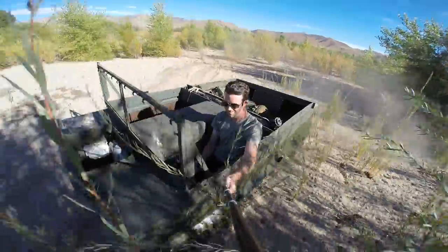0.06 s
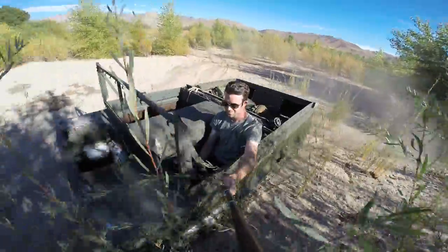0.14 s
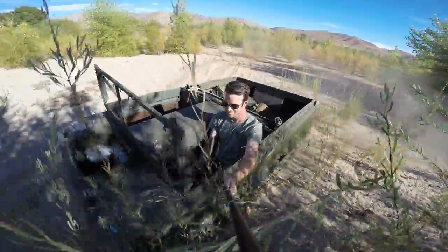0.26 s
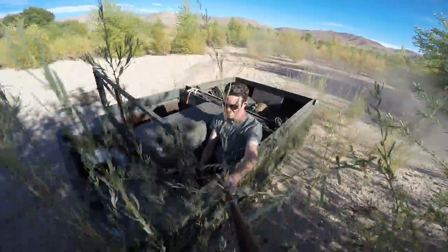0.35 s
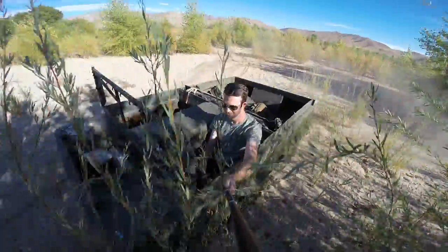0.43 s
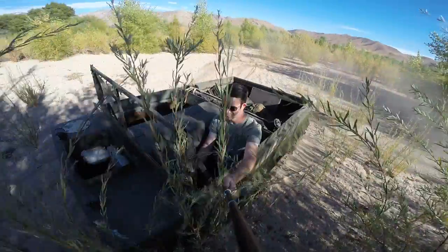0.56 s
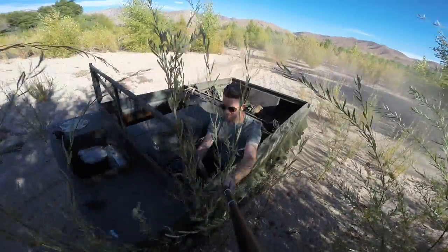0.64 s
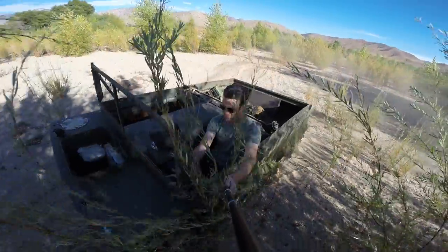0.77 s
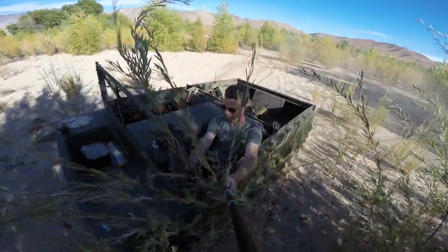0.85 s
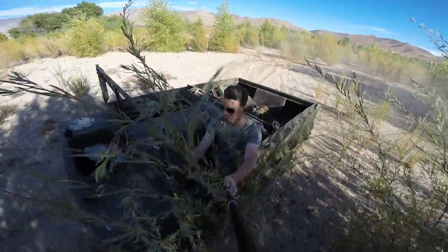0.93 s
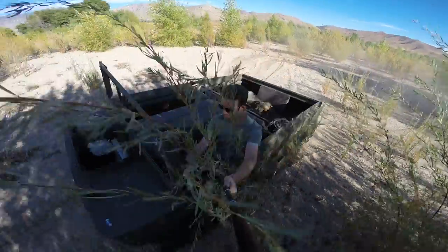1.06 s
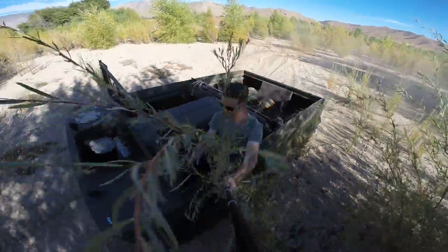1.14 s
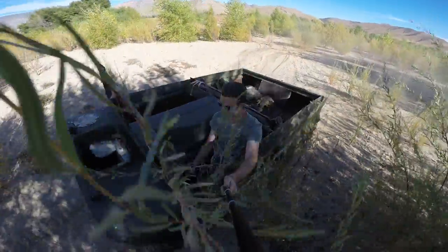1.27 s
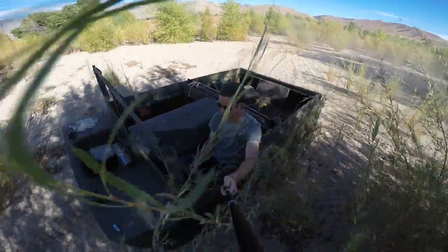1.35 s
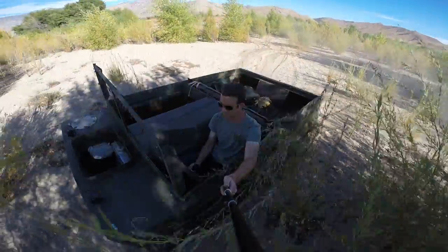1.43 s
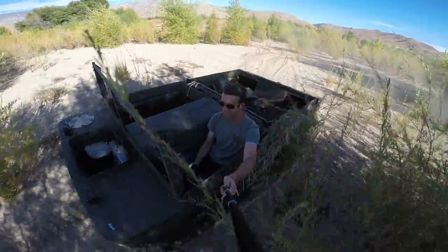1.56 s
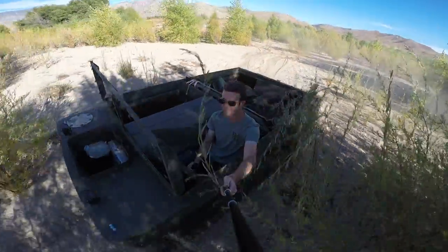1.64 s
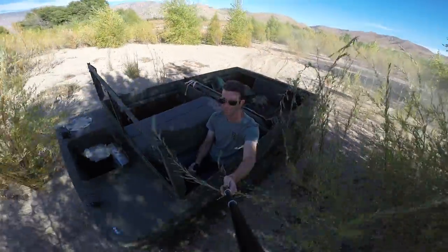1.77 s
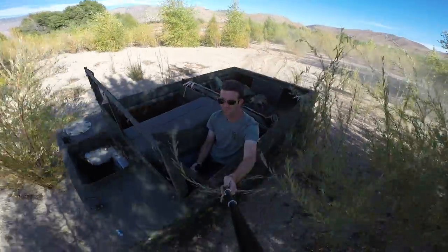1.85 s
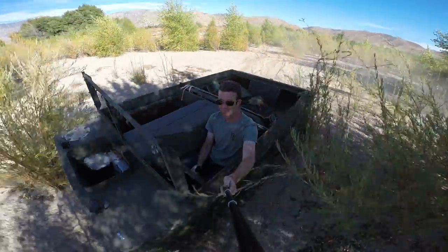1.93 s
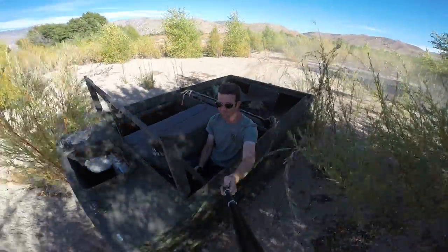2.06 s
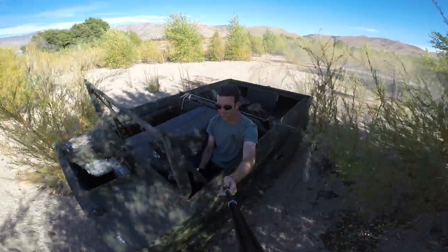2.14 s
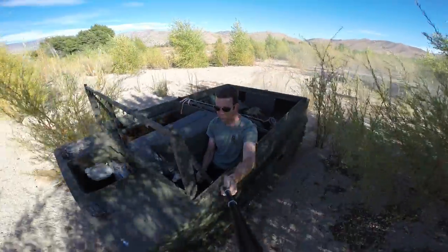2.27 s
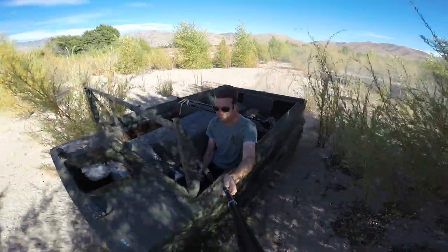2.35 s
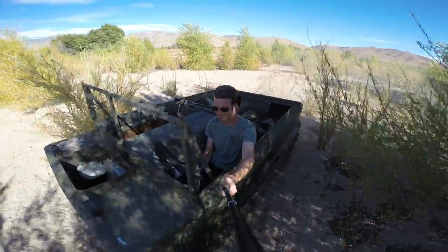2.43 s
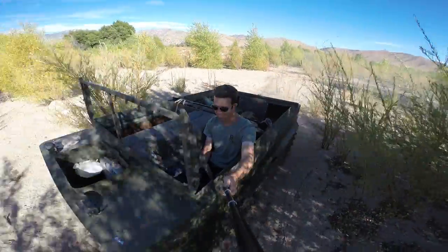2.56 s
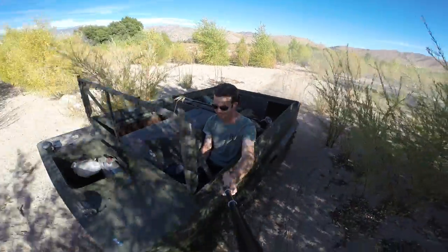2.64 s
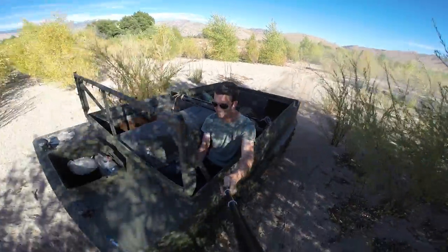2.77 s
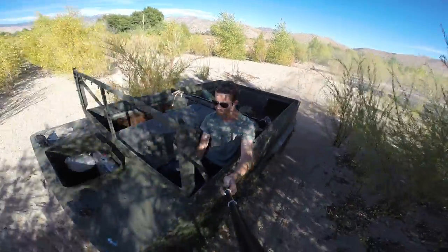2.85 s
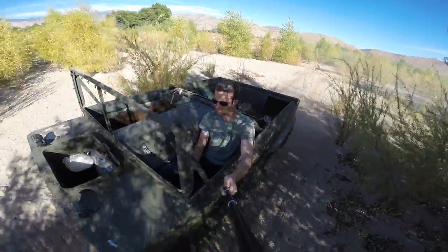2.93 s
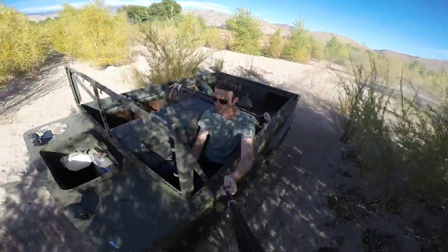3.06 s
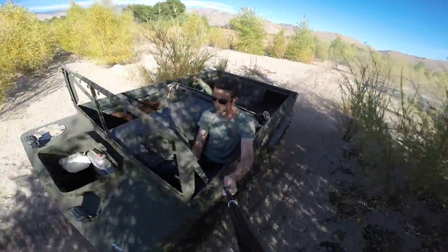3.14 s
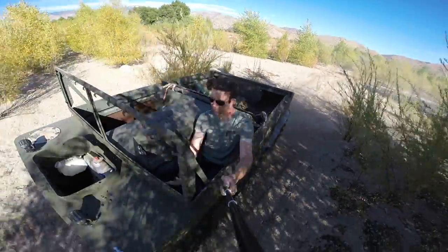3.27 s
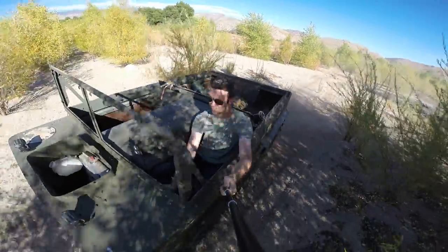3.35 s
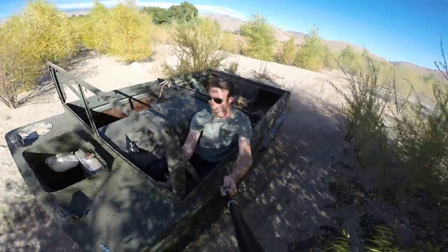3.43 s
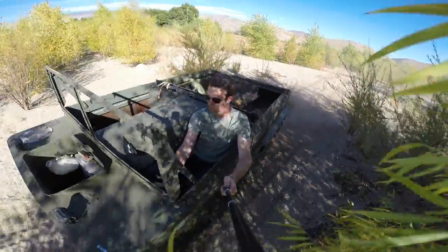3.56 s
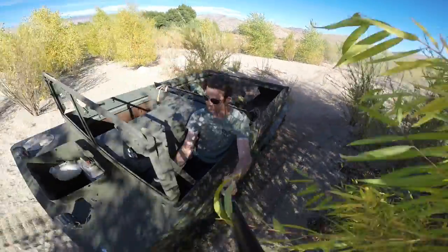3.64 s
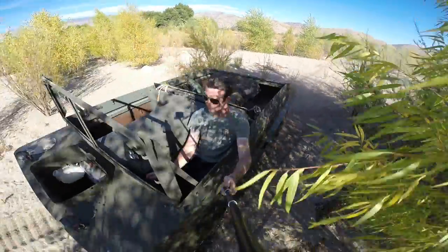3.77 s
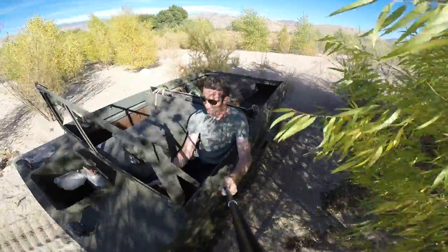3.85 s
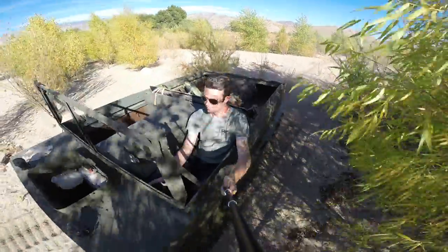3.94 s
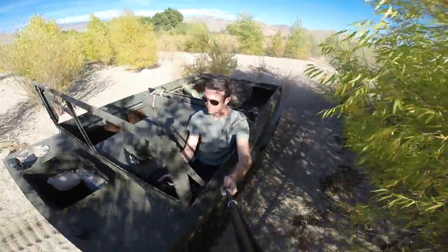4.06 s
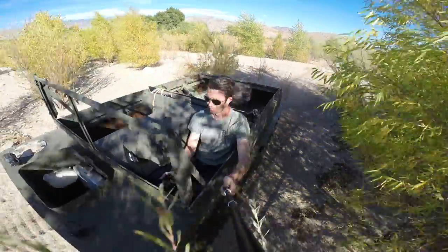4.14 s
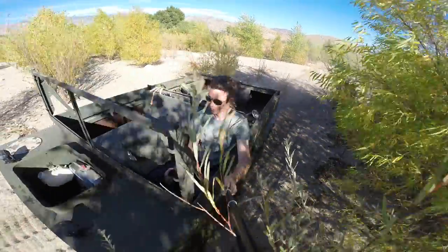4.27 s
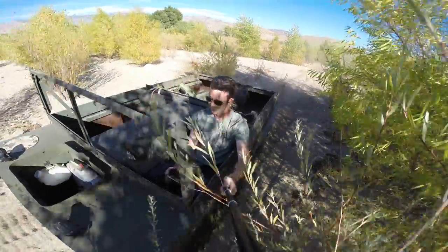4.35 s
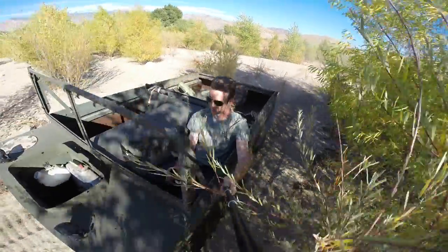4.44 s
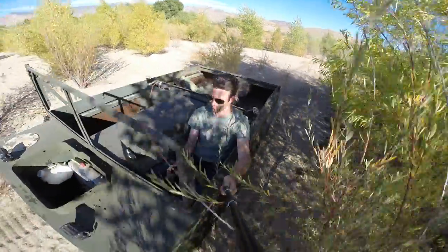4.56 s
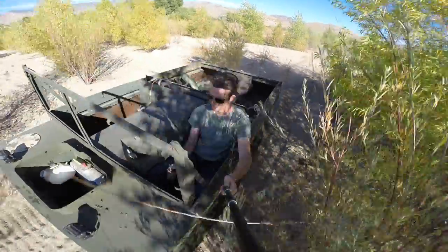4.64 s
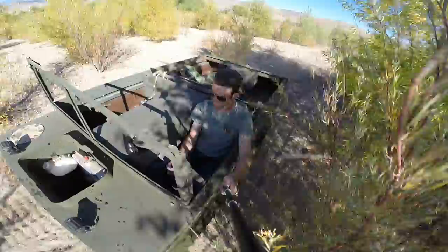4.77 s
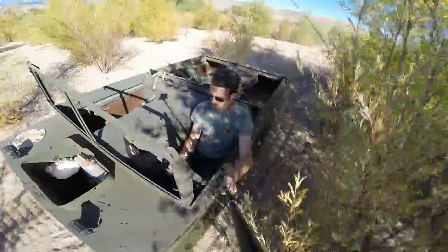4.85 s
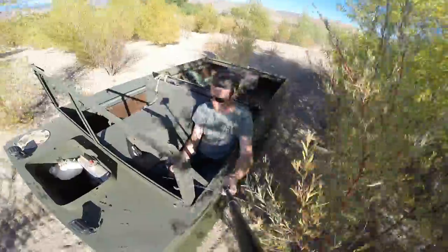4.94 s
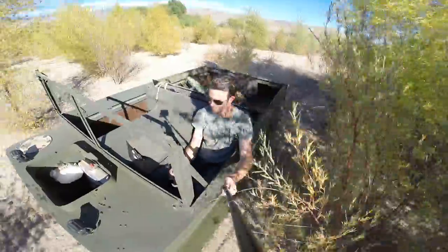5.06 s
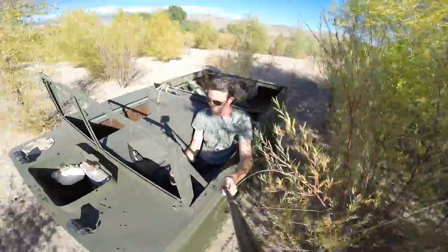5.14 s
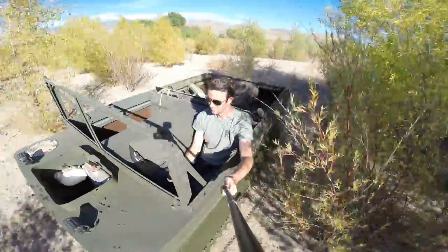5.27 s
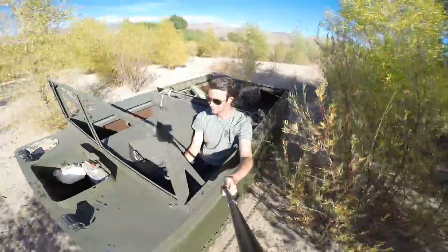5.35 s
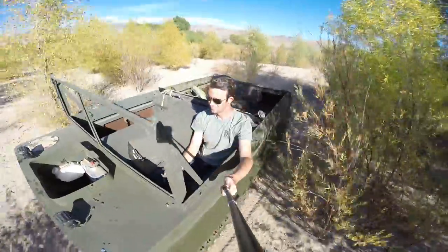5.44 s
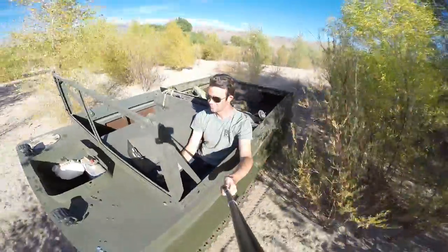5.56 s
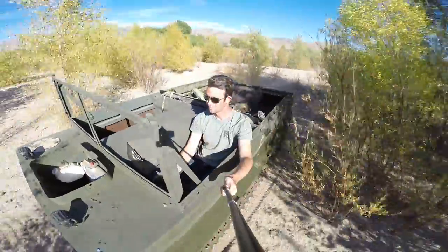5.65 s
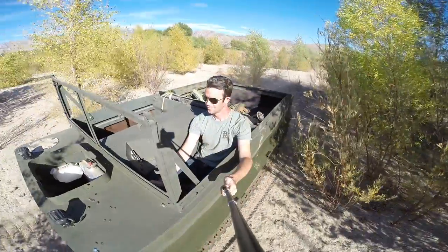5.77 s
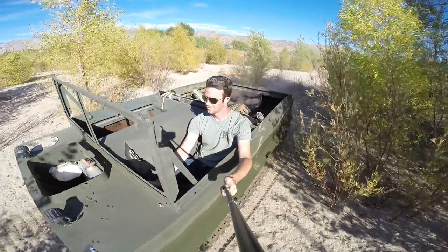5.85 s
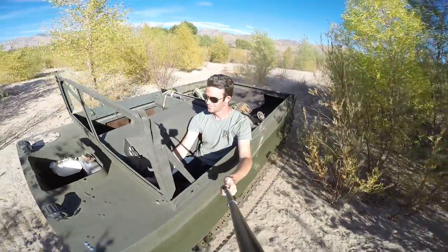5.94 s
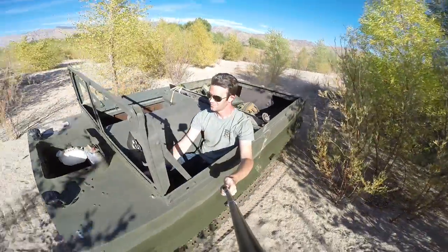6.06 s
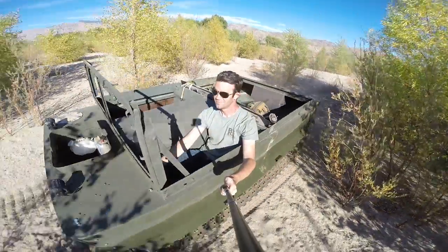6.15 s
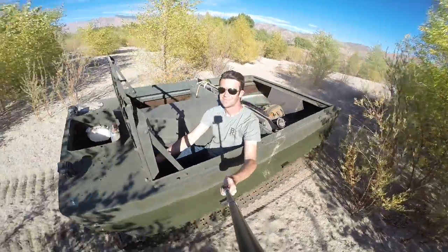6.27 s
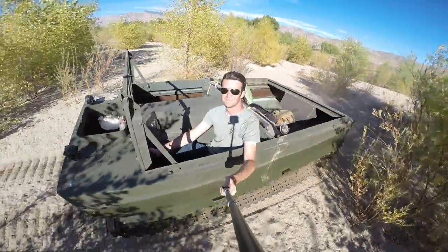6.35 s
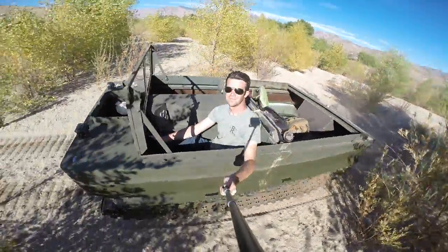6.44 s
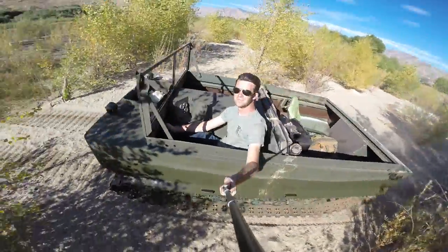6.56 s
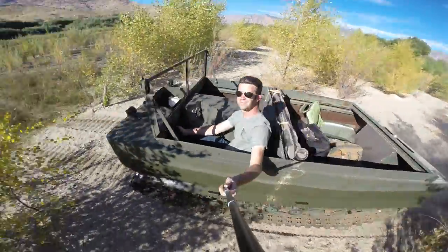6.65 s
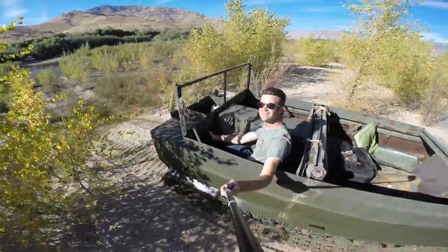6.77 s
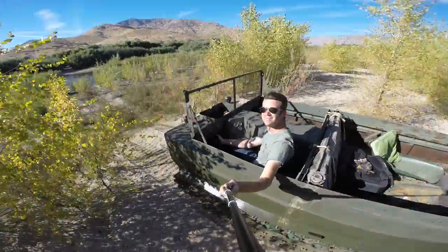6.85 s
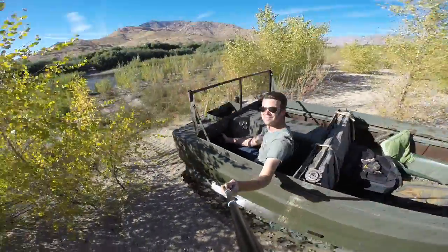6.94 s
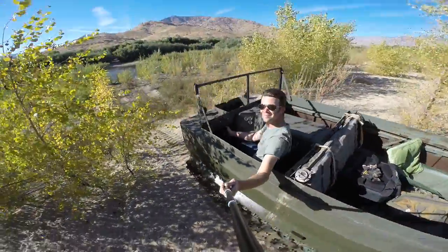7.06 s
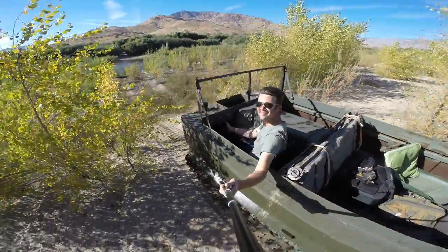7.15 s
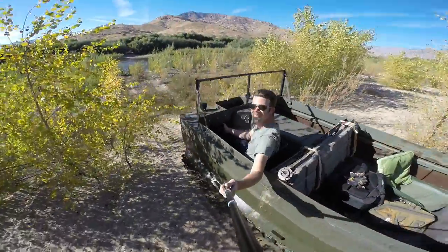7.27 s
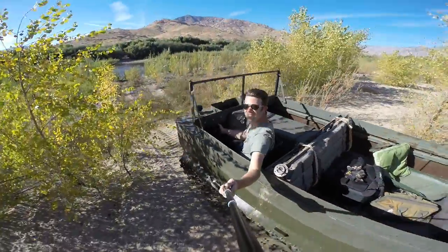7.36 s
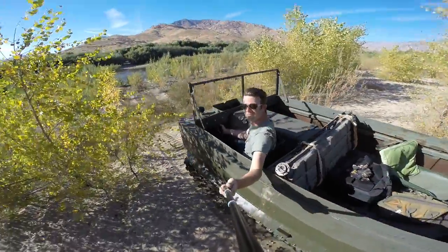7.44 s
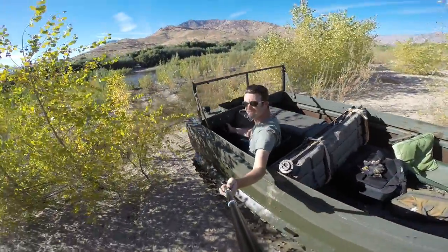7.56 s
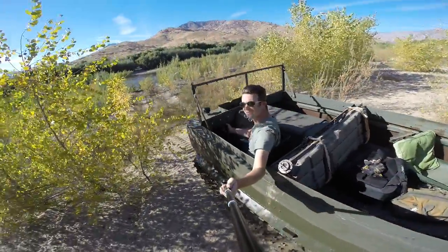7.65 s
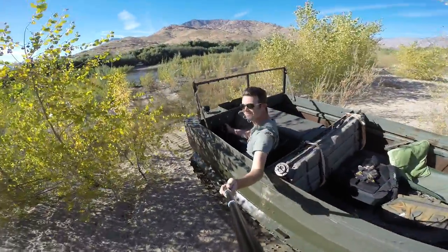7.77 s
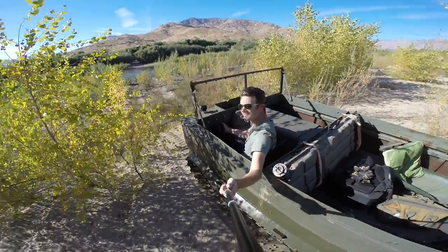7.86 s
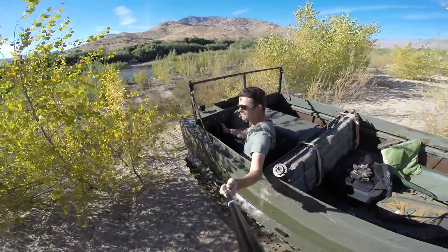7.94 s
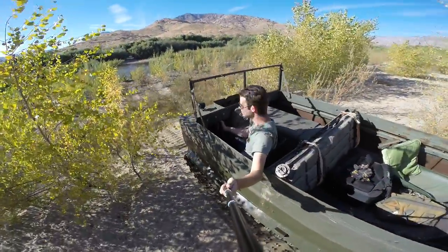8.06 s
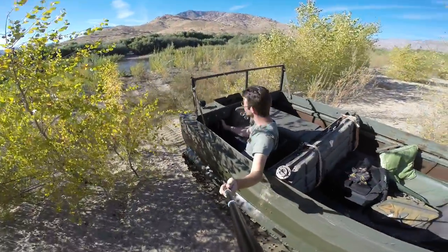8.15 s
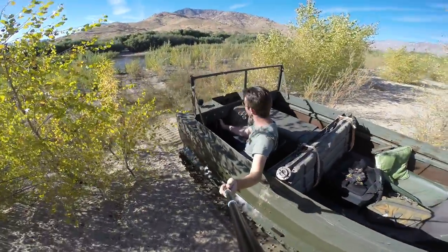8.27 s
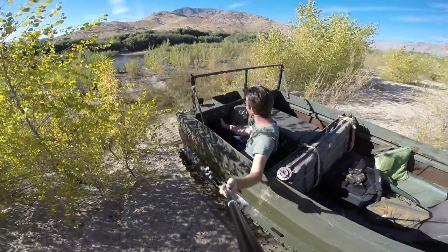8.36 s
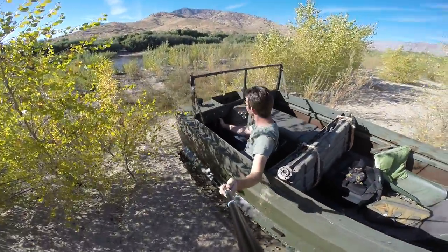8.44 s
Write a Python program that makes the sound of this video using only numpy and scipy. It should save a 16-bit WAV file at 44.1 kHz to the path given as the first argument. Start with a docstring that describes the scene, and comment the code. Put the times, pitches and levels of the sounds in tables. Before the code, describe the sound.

Twigs crack, rap and scrape loudly on a pole-mounted camera case over a quiet droning engine, hissing tracks in sand and low wind rumble.

```python
"""An engine drones, tracks hiss in sand and wind rumbles at the microphone; soon twigs rap and scrape
a small camera case on a hand-held pole, beside a tracked vehicle pushing through brush.
Engine: wavering sine orders plus rough roar. Tracks and wind: noise shaped by spectrum tables.
Scrapes and raps: slips and blows that ring the case modes. Jolts: decaying bending modes of the pole."""
import sys
import numpy as np
from scipy import signal
from scipy.io import wavfile
from scipy.ndimage import uniform_filter1d

SR = 44100
rng = np.random.default_rng(int(sys.argv[2]) if len(sys.argv) > 2 else 0)


def log_audio(samples):
    """Write samples as a 16-bit WAV file to the path given in sys.argv[1]."""
    # one column per channel
    frames = np.atleast_2d(samples).T
    # limit to full scale, then quantise
    limited = np.clip(frames, -1, 1)
    pcm = np.round(limited * 32767).astype(np.int16)
    wavfile.write(sys.argv[1], SR, pcm)


N = 375291

# Running gear spectrum, tracks, fan and casing heard through the case: (frequency [Hz], level [dB])
GEAR_SPECTRUM = [(120, -24.5), (200, 4), (268, -14), (725, -14), (1110, -22), (1310, -12.5), (1540, -20),
                 (1960, -15), (3400, -22), (5390, -31), (6130, -20), (7930, -31), (13300, -41.5),
                 (15400, -51), (16300, -73.5)]
# Humps added to it at the side of the vehicle: (centre [Hz], width [Hz], height [dB])
GEAR_SIDE_HUMPS = [(1310, 160, 1), (3450, 71, 7), (4730, 390, 7.5), (6140, 350, 4)]
# Wind spectrum: (frequency [Hz], level [dB])
WIND_SPECTRUM = [(8.8, -24.5), (15, 0), (37, 4.5), (83, 0.5), (126, -10.5), (162, -25), (196, -20.5),
                 (500, -31), (650, -65), (1100, -120)]
# Wind strength at the microphone: (time [s], level [dB])
GUSTS = [(0, -34.5), (.9, -36), (1.12, -28.5), (1.3, -34), (1.8, -21.5), (2.15, -36), (4.3, -38.5),
         (5.7, -39.5), (6.2, -35.5), (6.65, -36), (6.9, -28), (7.2, -34.5), (7.8, -39), (8.51, -41)]
# Engine course: (time [s], half the firing rate [Hz], level [dB])
ENGINE_COURSE = [(0, 62, -40), (.6, 63.5, -41), (1.6, 67.8, -40), (2.2, 67.14, -37.5), (2.9, 61.7, -41.5),
                 (3.4, 59.3, -43), (3.7, 62.83, -42.5), (4.4, 70.8, -41.5), (4.9, 65.73, -37.5),
                 (5.8, 55, -55), (6.5, 47.74, -49.5), (8, 40.8, -49.5), (8.2, 43, -38.5), (8.51, 48.8, -41)]
# Exhaust orders: (multiple of half the firing rate, level [dB])
EXHAUST_ORDERS = [(1, 1), (2, 1), (3, -20.5), (4, -22)]
# Background sinks around the end of two long loud scrapes: (time of reaching the lowest [s], depth [dB])
DIPS = [(1.43, -15), (4.88, -17)]
# Ringing modes of the camera case: (frequency [Hz], level [dB], undamped t60 [s])
CASE_MODES = [(501, -27.5, .12), (618, -14.5, 0.12), (727, -13.5, 0.065), (1071.4, -16.5, 0.13),
              (1388, 0, 0.033), (1557, -7.5, 0.025), (1780, 5.5, 0.021), (1932, -21, 0.24),
              (2308, 4.5, 0.019), (2586, 1.5, 0.027), (2758, -8, 0.032), (3165, -18, 0.039),
              (3580, -10, 0.024), (4067, -10.5, 0.027), (4380, -16.5, 0.017), (5155, -16.5, 0.047),
              (5960, -11.5, 0.023), (6560, -14.5, 0.023), (7366, -10.5, 0.016), (9300, -11, 0.0042),
              (10760, -21, 0.011), (13160, -34.5, .012), (15000, -42.5, .015)]
# Branches sliding over the case: (start [s], end [s], level at start [dB], level at end [dB],
# leafiness [0 bare twigs that ring .. 1 leafy sprays that slap and damp])
SCRAPES = [(0.188, .26, -35, -36, 0.22), (0.259, .38, -38, -38.5, .02), (0.381, 0.518, -36, -35.5, 0.24),
           (0.529, 0.818, -51, -44, 0.1), (0.859, 1.003, -42, -26.5, 0.22), (0.998, 1.098, -31, -43, .05),
           (1.099, 1.446, -39.5, -31, 0.13), (1.706, 1.86, -48.5, -48, 0.07),
           (1.865, 2.082, -38.5, -41, 0.37), (3.553, 3.654, -44, -47, 0.56), (3.757, 3.875, -50, -45, 0.61),
           (4.347, 4.53, -36, -28.5, 0.46), (4.53, 4.908, -29.5, -35.5, 0.53),
           (5.032, 5.104, -46, -63.5, 0.51), (5.102, 5.209, -51.5, -42, 0.1),
           (5.21, 5.317, -44, -32.5, 0.35), (6.698, 6.783, -48, -38, 0.062), (6.789, 6.846, -31, -35, .05),
           (6.864, 7.068, -45.5, -45.5, 0.027), (7.141, 7.199, -47.5, -36.5, 0.028),
           (7.2, 7.27, -40.5, -54, 0.034), (7.558, 7.675, -57, -60, .03)]
# Bending modes of the pole: (frequency [Hz], t60 [s])
POLE_MODES = [(43, 0.36), (62, 0.24), (80, .1), (103, 0.18), (140, 0.062), (250, 0.069), (350, 0.024),
              (484, 0.14)]
# Jolts of the pole: (time [s], level [dB], frequency where the shove works best [Hz])
JOLTS = [(.22, -20.5, 480), (.5, -14, 197), (.93, -14, 91), (1.046, -4.5, 91), (1.076, -5.5, 77.4),
         (1.11, -7, 123), (1.126, -18.5, 251), (1.149, -7, 81.6), (1.182, -11.5, 90), (1.201, -22, 99.5),
         (1.632, -18, 66.2), (1.722, -12, 190), (3.575, -22, 320), (2.04, -29, 248), (3.759, -16.5, 244),
         (3.821, -24.5, 244), (4.377, -7.5, 177), (4.405, -11.5, 294), (5.03, -29.5, 80),
         (5.297, -30.5, 250), (6.741, -3, 111), (6.791, 1.5, 95.8), (6.814, -2.5, 129), (6.932, 0, 79),
         (6.974, -9, 91.1), (7.035, -7.5, 87), (7.081, -15, 60), (7.559, -14, 267), (7.56, -7, 94.4),
         (7.562, -22, 483), (7.575, -7, 43)]
# Twig raps that stand out: (time [s], peak of the hit [dB], favoured ring [Hz], drag re that peak [dB])
RAPS = [(.2203, -2.5, 2350, -24), (.245, -18, 2300, -33), (0.3859, -8.5, 2660, -15),
        (0.4343, -13.5, 2530, -10), (0.4572, 0, 2650, -38), (.4987, -20, 1420, -29),
        (0.5321, -17.5, 1445, -15.5), (0.606, -14, 2800, -26), (0.6812, -11.5, 2800, -24),
        (0.7138, -8.5, 1330, -23.5), (0.743, -12.5, 1980, -22.5), (0.9706, -3.5, 1485, -17),
        (0.9903, -6.5, 2470, -30), (1.0618, -19, 1710, -17), (1.127, -5.5, 1400, -32.5),
        (1.1682, -21.5, 1400, -13.5), (1.201, 2, 2440, -34.5), (1.244, -18.5, 2460, -15.5),
        (1.3102, -8, 2550, -19.5), (1.3175, 0, 2320, -23.5), (1.351, -12.5, 1790, -23),
        (1.3761, -10, 2500, -26), (1.403, -15.5, 1900, -7.5), (1.419, -3.5, 1307, -37),
        (1.7142, -27.5, 1730, -23), (1.7211, -5, 1640, -39), (1.8648, -23.5, 2600, -25),
        (1.8827, -13.5, 1655, -26), (1.9931, -16.5, 1400, -41), (2.036, -14, 2150, -13.5),
        (2.0617, -15, 2170, -28), (3.577, -14.5, 1570, -21), (3.604, -19, 2450, -21),
        (3.616, -17.5, 2060, -13), (3.6356, -13.5, 2120, -32), (3.656, -29.5, 2050, -31),
        (3.758, -1, 2270, -27.5), (3.7834, -13, 2360, -9), (3.7953, -3, 2300, -20), (3.82, -7, 1970, -27),
        (3.8369, -5.5, 2540, -29), (3.8625, -13.5, 2280, -13.5), (4.346, -14, 2300, -5.5),
        (4.3597, -2.5, 2600, -16), (4.378, -4.5, 2320, -28), (4.3888, -6, 1780, -6),
        (4.4038, -9, 2670, -15.5), (4.459, -9.5, 2304, -31), (4.4844, -6, 2220, -16),
        (4.532, -6.5, 2392, -8.5), (4.5446, -8.5, 2580, -15.5), (4.588, -2.5, 2550, -21.5),
        (4.615, -9, 1310, -19), (4.6303, -9.5, 2530, -10), (4.6465, -3.5, 2260, -32),
        (4.6744, -4.5, 2670, -27), (4.7278, -1.5, 2345, -26), (4.7884, -1, 2280, -28),
        (4.81, -4, 1530, -19), (4.8295, -6.5, 2320, -18), (4.8435, -.5, 2380, -28),
        (4.8627, -0.5, 1910, -47), (5.0269, -18.5, 2000, -28), (5.224, -22.5, 2570, -17),
        (5.2781, -28.5, 2380, -10.5), (5.31, -18, 1370, -43), (6.6756, -29, 1371, -28),
        (6.6931, -22.5, 2260, -34), (6.742, -10, 1375, -26.5), (6.792, -15.5, 1400, -15),
        (6.8128, -8.5, 1440, -25), (6.881, -20, 1385, -19), (6.931, -23.5, 1510, -14),
        (7.0298, -29, 1700, -27), (7.561, -8.5, 2190, -38), (7.61, -30, 1400, -21)]

GEAR_DB, GEAR_DB_PER_OCTAVE, CRUISE_HZ = -44.5, 12, 67  # gear level at cruise, growth with engine speed
PULL_HZ_PER_S, PULL_TONE_DB, PULL_ROAR_DB = 12.8, 2.5, -6  # revving up: tones stand out, roar sinks
SINK_S, HOLD_S, RECOVER_DB_PER_S = 0.11, 0.11, 17
TREBLE_BARE_DB, TREBLE_LEAFY_DB, TREBLE_SPREAD_DB = -19.5, 7.5, 1
TICKS_PER_S, TICK_OVER_DB, TICK_SPREAD_DB, TICK_DRAG_DB = 30, 10, 4, -28
DRAG_SHORTEST_S, DRAG_LONGEST_S = .004, .048
TREBLE_FROM_HZ = 3300  # case modes above this follow the treble strength
EDGE_HZ = 16400


def amp(db):
    """Amplitude factor of a level in dB."""
    return 10 ** (np.asarray(db) / 20)


def evened(x):
    """Scale to an RMS of 1."""
    return x / np.sqrt(np.mean(x ** 2) + 1e-20)


def curve(rows):
    """Columns after the time column, sample by sample."""
    s, *columns = np.transpose(rows)
    return [np.interp(np.arange(N) / SR, s, c) for c in columns]


def read(points, hz):
    """Spectrum table read on a log-frequency axis."""
    f, value = np.transpose(points)
    return np.interp(np.log(hz + 1), np.log(f + 1), value)


def wander(length, knot_s):
    """Slow random drift: normal knots of spread 1 joined by straight lines."""
    knots = rng.standard_normal(int(length / SR / .002) + 3)
    return np.interp(np.arange(length) / SR / max(knot_s, .002), np.arange(len(knots)), knots)


def add(mix, s, sound):
    """Add a sound at time s, cut at the end of the mix."""
    part = mix[round(s * SR):][:len(sound)]
    part += sound[:len(part)]


def noise(colour_db, size, patchy_db, flicker_db):
    """Random short-time spectra with drifting patches and a flicker common to all pitches."""
    hz = np.fft.rfftfreq(size, 1 / SR)
    real, imag, patches = rng.standard_normal((N * 4 // size + 6, len(hz), 3)).T
    flicker = evened(uniform_filter1d(rng.standard_normal(real.shape[1]), size=3))
    patches = uniform_filter1d(patches, size=8, axis=0)  # across pitch
    patches = evened(uniform_filter1d(patches, size=10, axis=1))  # across time
    level_db = colour_db(hz)[:, None] + patchy_db * patches + flicker_db * flicker
    spectra = (real + 1j * imag) * amp(level_db)
    return evened(signal.istft(spectra, nperseg=size, noverlap=size * 3 // 4)[1][:N])


def hump(hz, centre_hz, width_hz, db):
    """Resonance-shaped rise of a spectrum, in dB."""
    return db / (1 + (2 * (hz - centre_hz) / width_hz) ** 2)


def running_gear():
    """Broadband hiss, louder with engine speed; its bands change as the pole swings round to the rear."""
    def side_db(hz):
        return read(GEAR_SPECTRUM, hz) + sum(hump(hz, *row) for row in GEAR_SIDE_HUMPS)

    def rear_db(hz):
        return read(GEAR_SPECTRUM, hz) + hump(hz, 5050., 950.0, 11.2)

    side = noise(side_db, size=512, patchy_db=2.0, flicker_db=0.9)
    rear = noise(rear_db, size=512, patchy_db=3, flicker_db=0.5)
    swing_rad = np.pi / 2 * curve([(6.6, 0.019), (7.6, 0.9)])[0]
    level_db = GEAR_DB + GEAR_DB_PER_OCTAVE * np.log2(curve(ENGINE_COURSE)[0] / CRUISE_HZ)
    return amp(level_db) * (np.cos(swing_rad) * side + np.sin(swing_rad) * rear)


def wind():
    """Low rumble at the microphone, in short lumps on top of the gusts."""
    rumble = noise(lambda hz: read(WIND_SPECTRUM, hz), size=2048, patchy_db=2.0, flicker_db=1.2)
    return amp(curve(GUSTS)[0] + 4.2 * wander(N, 0.034)) * rumble


def engine():
    """Low exhaust orders; uneven firing makes the tones waver and a rough roar surround them."""
    hz, level_db = curve(ENGINE_COURSE)
    turns = np.cumsum(hz * (1 + 0.0088 * wander(N, .03))) / SR
    tones = np.zeros(N)
    for multiple, db in EXHAUST_ORDERS:
        tone = np.sin(2 * np.pi * (multiple * turns + rng.random()))
        tones += amp(db + 2 * wander(N, 0.026)) * tone
    roar = amp(3.0) * wander(N, .006) * np.sin(2 * np.pi * 2.2 * turns)
    rise_hz_per_s = uniform_filter1d(np.gradient(hz), size=SR // 10) * SR
    pull = np.clip(rise_hz_per_s / PULL_HZ_PER_S, -1, 1)
    return amp(level_db) * (amp(PULL_TONE_DB * (2 * pull - 1)) * tones + amp(PULL_ROAR_DB * pull) * roar)


def dips():
    """Background gain: sinks quickly, holds, creeps back at a steady dB rate."""
    gain_db = np.zeros(N)
    for s, db in DIPS:
        release_s = s + HOLD_S
        gain_db += curve([(s - SINK_S, 0), (s, db), (release_s, db), (release_s - db / RECOVER_DB_PER_S, 0)])[0]
    return amp(gain_db)


def touch_treble_db(leafy):
    """Treble strength of a touch; leaves brighten it."""
    return TREBLE_BARE_DB + (TREBLE_LEAFY_DB - TREBLE_BARE_DB) * leafy


def ring(x, hz, t60_s):
    """Two-pole resonator: every click in x starts a dying sine of proportional height."""
    r, w = 10 ** (-3 / (t60_s * SR)), 2 * np.pi * hz / SR
    return signal.lfilter([0, np.sin(w)], [1, -2 * r * np.cos(w), r * r], x)


def band(x, low_hz, high_hz):
    """Band-pass."""
    return signal.sosfilt(signal.butter(2, [low_hz, high_hz], "band", fs=SR, output="sos"), x)


def scrape(start_s, end_s, first_db, last_db, leafy):
    """Dense uneven slips ring the case; the touch point wanders, so modes take turns; leaves add fizz."""
    t = np.arange(start_s, end_s + .12, 1 / SR)  # room to ring out
    n = len(t)
    slips = (rng.random(n) < 4000 / SR) * rng.choice([-1, 1], n)  # 4000 per second
    slips = slips * amp(1.5 * rng.exponential(1, n).clip(0, 5))
    push = evened(slips * amp(3. * wander(n, .006))) * (t < end_s)
    push = push * amp(np.interp(t, [start_s, end_s], [first_db, last_db]))
    treble = amp(touch_treble_db(leafy))
    fizz = band(push * treble, 3000., 9000.)
    rustle = band(push, 1300., 3000.)
    out = amp(-5.5) * fizz + amp(3.0) * rustle
    for hz, db, t60_s in CASE_MODES:
        drive = push * amp(4.8 * wander(n, .02))
        if hz > TREBLE_FROM_HZ:
            drive = drive * treble * amp(17.5)
        out += amp(db - 32.0) * ring(drive, hz, t60_s)
    return out


def ticks():
    """Small twigs: rows like RAPS, scattered at random over the scrapes, following their level."""
    rows = []
    for start_s, end_s, first_db, last_db, _ in SCRAPES:
        times_s = start_s + np.cumsum(rng.exponential(1 / TICKS_PER_S, size=24))
        levels_db = np.interp(times_s, [start_s, end_s], [first_db, last_db]) + TICK_OVER_DB
        levels_db = levels_db + TICK_SPREAD_DB * rng.standard_normal(size=24)
        favoured_hz = rng.uniform(1384.0, 2530.0, size=24)
        for s, db, hz in zip(times_s, levels_db, favoured_hz):
            if s < end_s:
                rows.append((s, db, hz, TICK_DRAG_DB))
    return rows


def jolt(db, best_hz):
    """A soft shove sets the pole bending; the swing builds over about one cycle."""
    t = np.arange(SR // 2) / SR
    hz, t60_s = np.transpose(POLE_MODES)[:, :, None]
    reach_db = -14. * abs(np.log2(hz / best_hz))
    build = 1 - np.exp(-1.5 * hz * t)
    return (amp(db + reach_db - 60 * t / t60_s) * np.sin(2 * np.pi * hz * t) * build).sum(0)


def rap(db, treble_db, favoured_hz, drag_db, drag_s, leafy):
    """A twig cracks on the case, rattles for a few ms and drags on; where it lands decides which modes ring."""
    hz, mode_db, t60_s = np.transpose(CASE_MODES)[:, :, None]
    mode_chance, polarity, bounce_delay, bounce_force = rng.standard_normal((4, len(CASE_MODES)))
    grit = rng.standard_normal(SR // 8)
    t = np.arange(len(grit)) / SR

    treble_lift_db = treble_db + 15.0 - 4.9 * leafy
    lift_db = np.where(hz > TREBLE_FROM_HZ, treble_lift_db, np.where(hz < 900, -3., 0))
    lift_db = lift_db + 10.55 * np.exp(-(np.log(hz / favoured_hz) / 0.068) ** 2)
    lift_db = lift_db + 3.97 * mode_chance[:, None]
    fade_db = 60 * t / t60_s * (1 + 1.2 * leafy)  # leaves damp the ring
    modes = amp(mode_db + lift_db - fade_db) * np.sin(2 * np.pi * hz * t)
    body = (modes * np.sign(polarity[:, None])).sum(0)
    # the contact itself
    crack = signal.lfilter([1, -1], [1, -1.15, .5], grit[::-1] * np.exp(-t / 0.00014))
    body = body * (1 - np.exp(-t / 0.000073)) + amp(treble_db - 0.5 + 10. * leafy) * crack

    blows, late = np.zeros(len(t)), abs(bounce_delay)  # late: in units of 2 ms
    blows[(late * .002 * SR).astype(int)] = bounce_force * np.exp(-.8 * late)
    blows[0] = 0.75
    hit = signal.fftconvolve(body, blows)

    lumps = amp(4.3 * wander(len(t), 0.0044))
    drag = signal.fftconvolve(body, grit ** 3 * lumps * (t < drag_s))
    drag = drag / np.std(drag[:round(drag_s * SR)])
    return amp(db) * (hit / abs(hit).max() + amp(drag_db) * drag)


def scene():
    """Dipping background, then scrapes, jolts, raps and ticks."""
    mix = (running_gear() + wind() + engine()) * dips()
    for row in SCRAPES:
        add(mix, row[0], scrape(*row))
    for s, *row in JOLTS:
        add(mix, s, jolt(*row))
    _, ends_s, *_, leaves = np.transpose(SCRAPES)
    rap_times_s = np.transpose(RAPS)[0]
    for s, db, hz, drag_db in list(RAPS) + ticks():
        branch = min(np.searchsorted(ends_s, s), len(ends_s) - 1)
        next_rap_s = rap_times_s[rap_times_s > s].min(initial=N / SR)
        # drags until the next rap or the branch lets go, within limits
        drag_s = np.clip(min(next_rap_s, ends_s[branch]) - s, DRAG_SHORTEST_S, DRAG_LONGEST_S)
        leafy = np.clip(leaves[branch], 0, 1)
        treble_db = touch_treble_db(leafy) + TREBLE_SPREAD_DB * rng.standard_normal()
        add(mix, s, rap(db, treble_db, hz, drag_db, drag_s, leafy))
    return mix[None]


def record(dry):
    """Peaks beyond full scale are cut flat; then a low-pass at the band edge."""
    clipped = np.clip(dry, -1, 1)
    low_pass = signal.firwin(511, EDGE_HZ, window=("kaiser", 9), fs=SR)
    return signal.oaconvolve(clipped, low_pass[None], "same")


dry = scene()
out = record(dry)
log_audio(out)
```